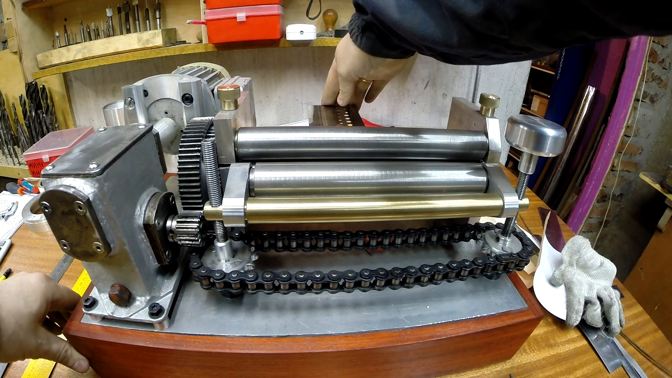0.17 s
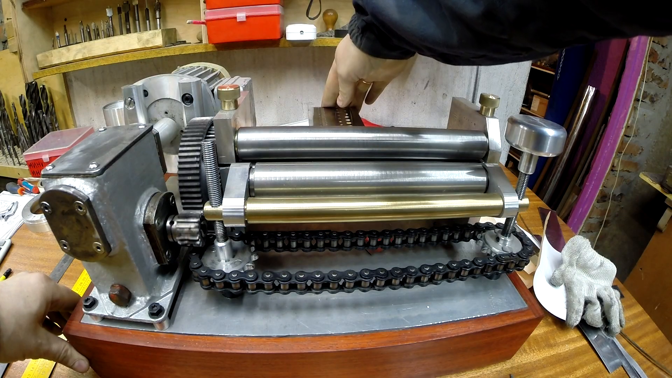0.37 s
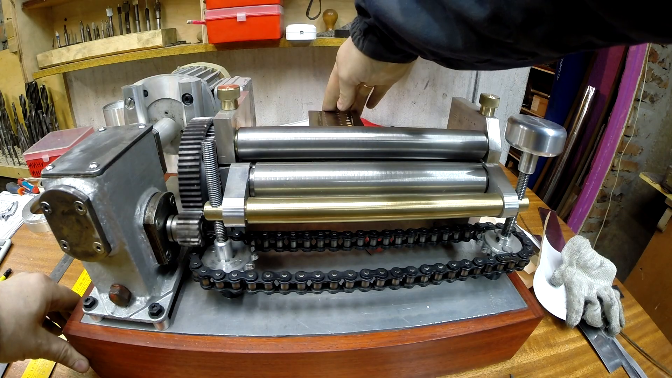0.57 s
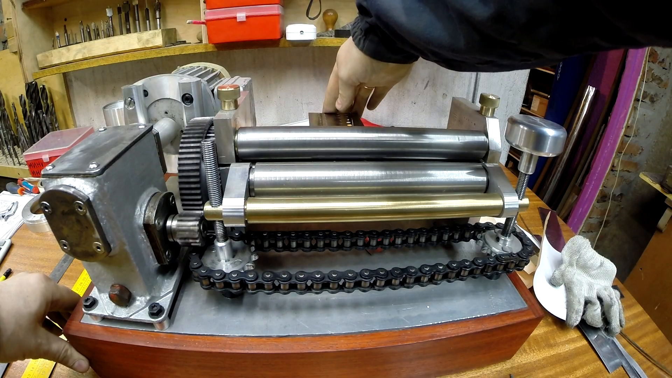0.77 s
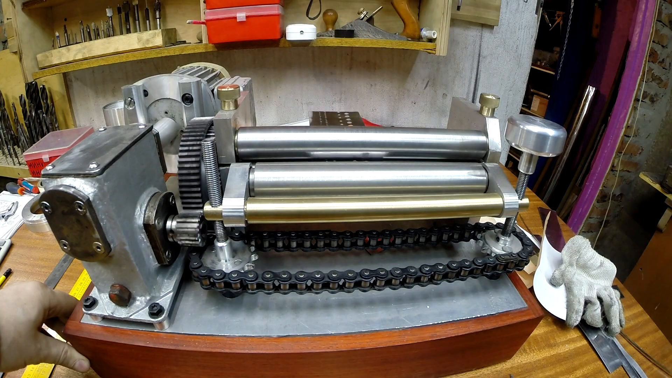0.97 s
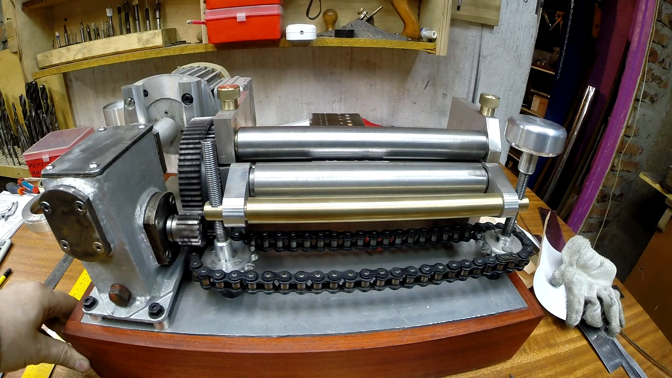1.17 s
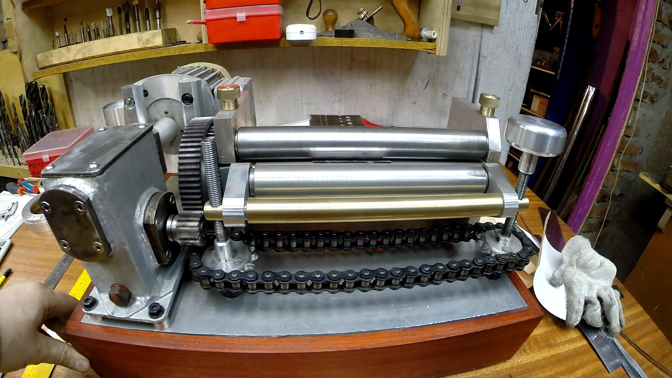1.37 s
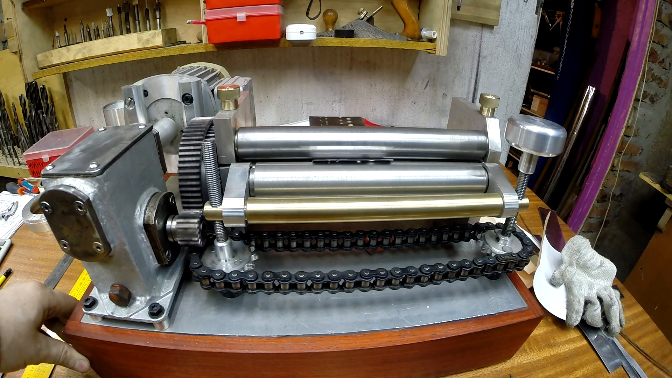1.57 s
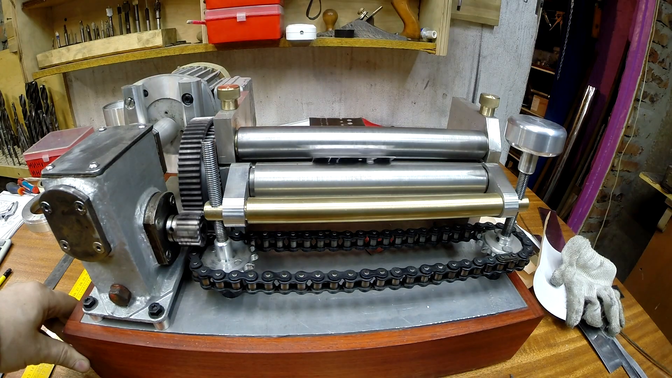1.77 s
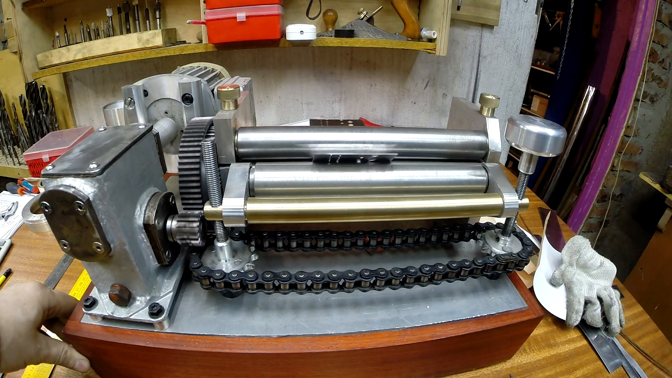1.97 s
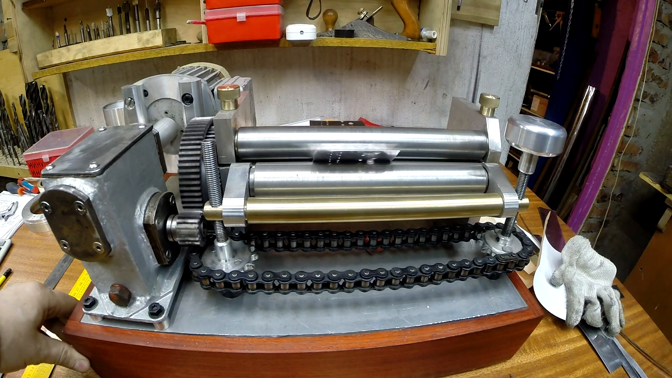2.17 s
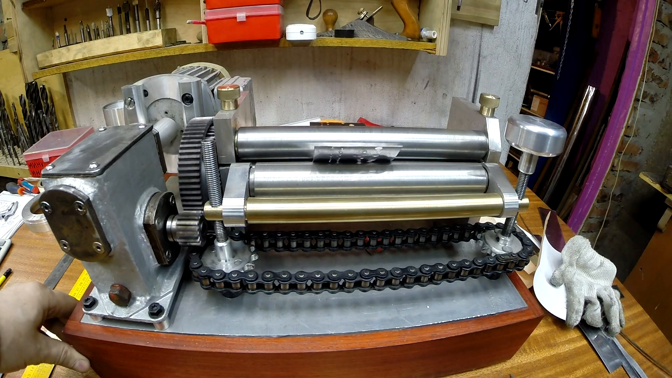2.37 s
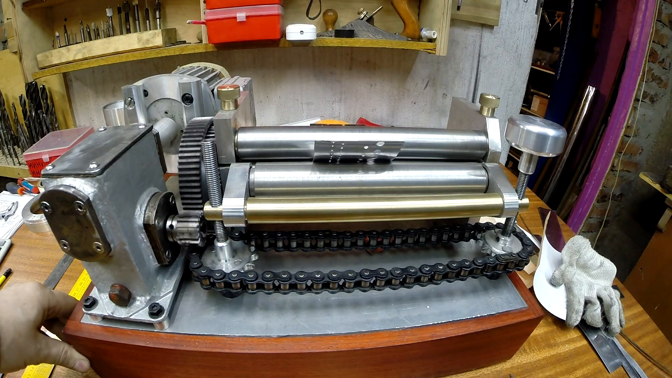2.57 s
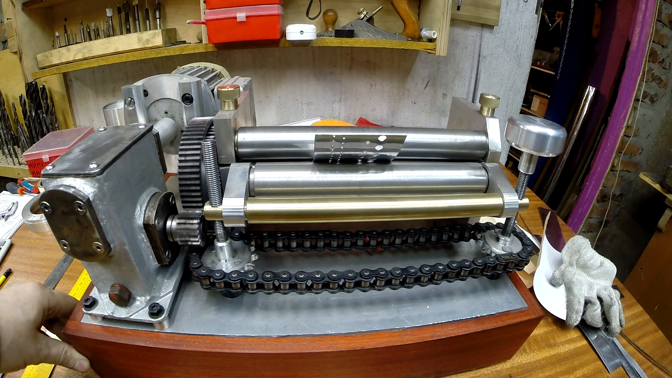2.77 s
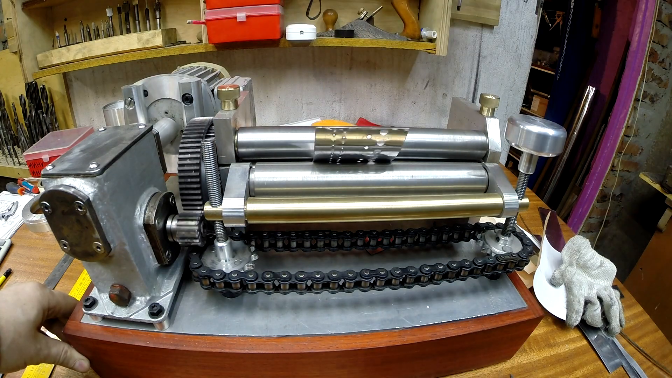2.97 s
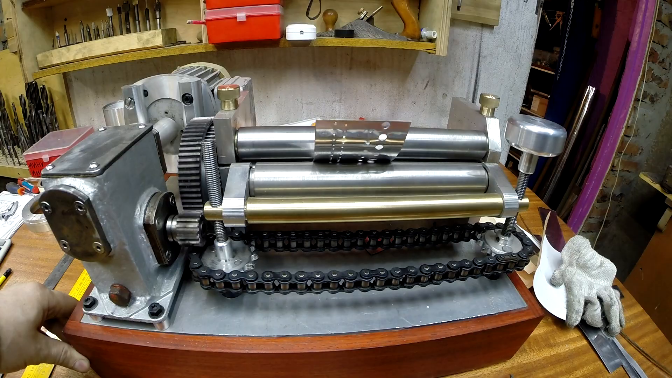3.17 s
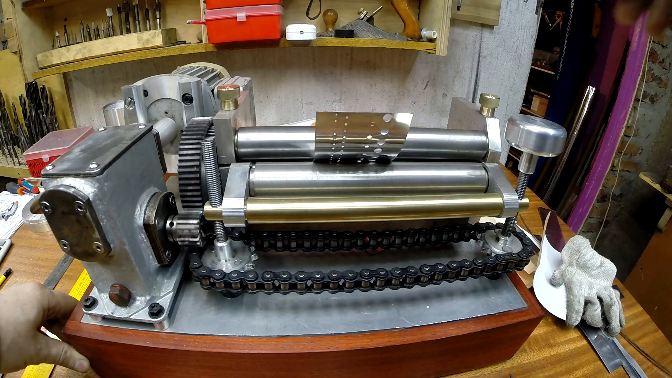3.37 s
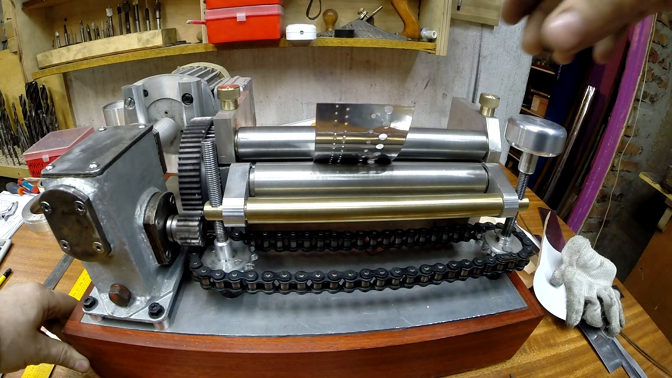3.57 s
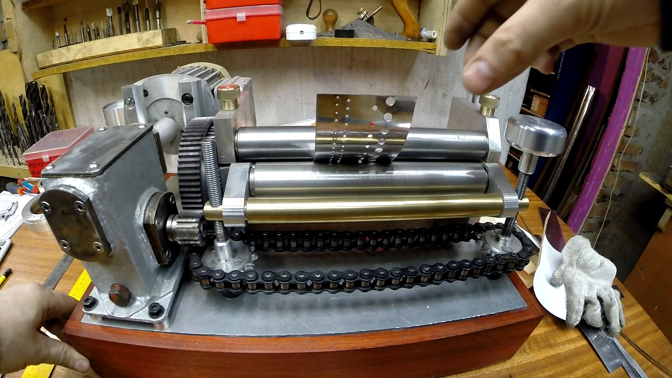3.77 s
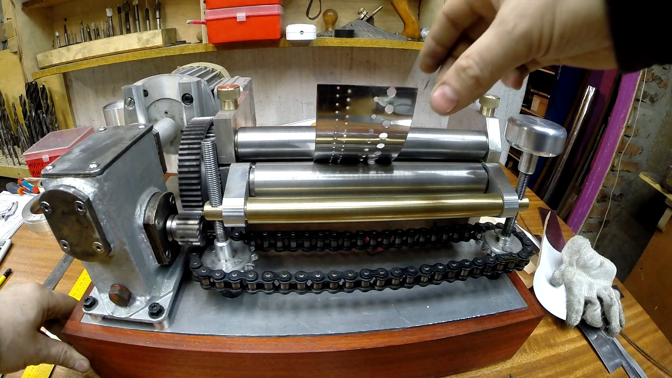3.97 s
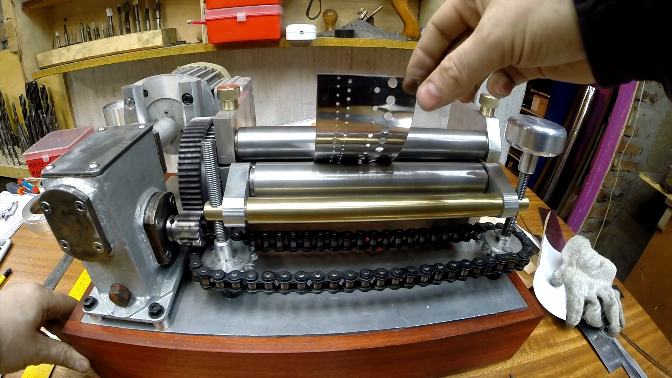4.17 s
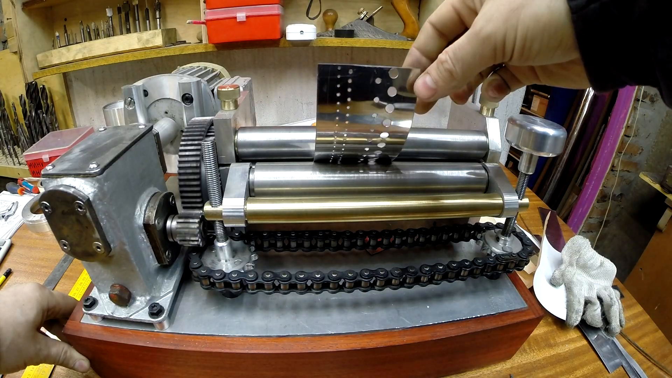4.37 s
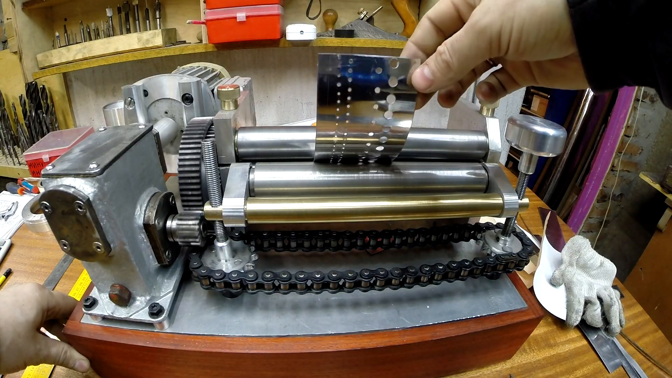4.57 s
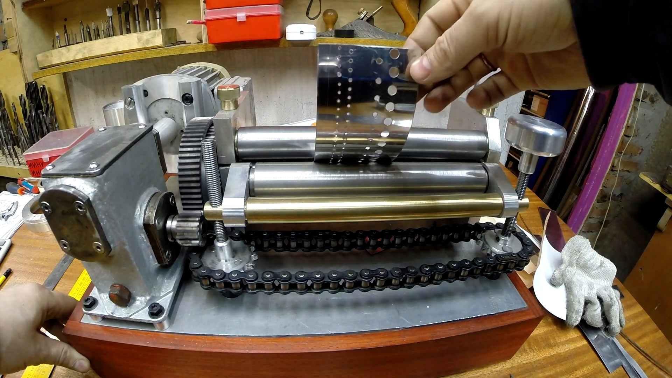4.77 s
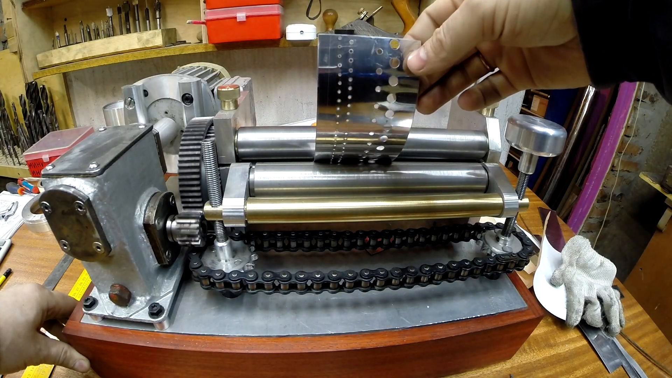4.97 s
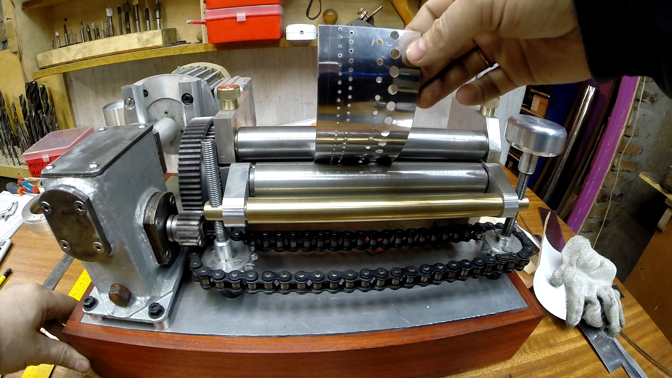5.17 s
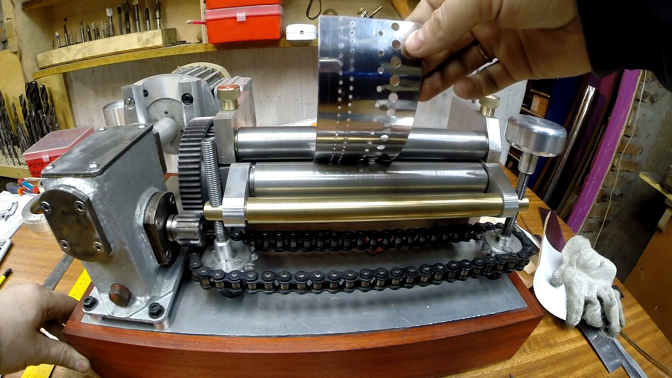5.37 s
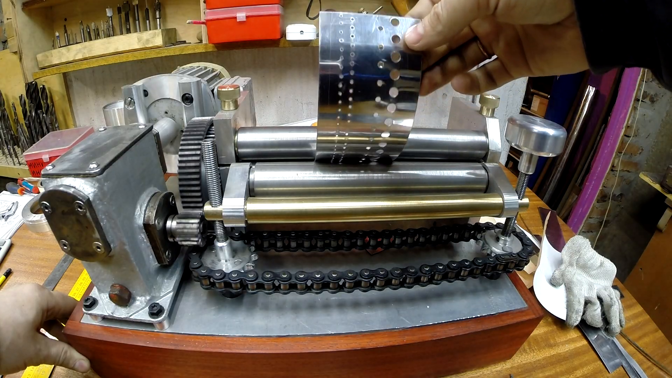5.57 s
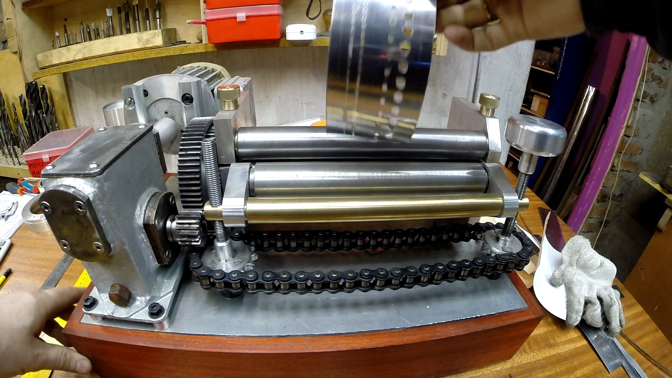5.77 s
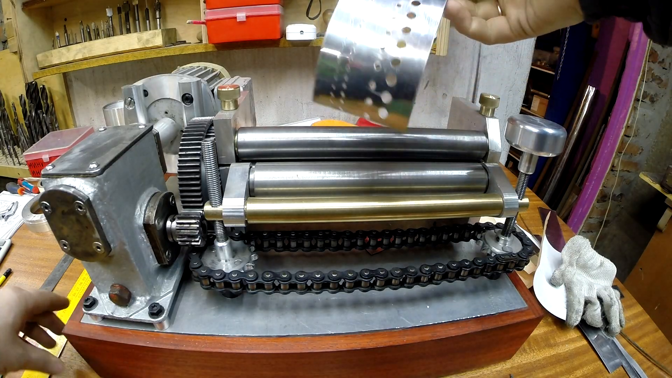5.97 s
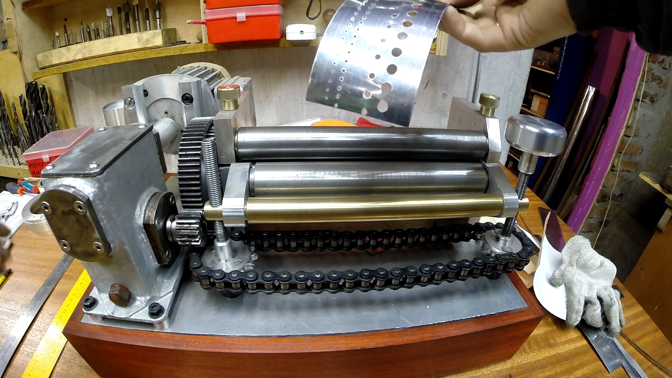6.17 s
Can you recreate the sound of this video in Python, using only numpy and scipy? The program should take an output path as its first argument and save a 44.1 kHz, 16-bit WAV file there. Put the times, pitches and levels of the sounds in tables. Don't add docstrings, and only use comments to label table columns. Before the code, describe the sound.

In a quiet workshop with faint fan air, a low thump of a button starts a small geared rolling machine. Gears clack, growl and settle into a loud, rough hum with rapid knocking, about twenty-six beats a second, over a booming wooden box. A brief cut comes near one second. Late on, a thin steel strip springs off the roller with bright clinks, then the motor brakes abruptly. Close, dry single microphone.

```python
import sys
import numpy as np
from scipy import signal
from scipy.fft import rfft, irfft, next_fast_len
from scipy.io import wavfile
from scipy.ndimage import uniform_filter1d

SR = 44100
rng = np.random.default_rng(int(sys.argv[2]) if len(sys.argv) > 2 else 0)


def log_audio(samples):
    frames = np.atleast_2d(samples).T
    limited = np.clip(frames, -1, 1)
    pcm = np.round(limited * 32767).astype(np.int16)
    wavfile.write(sys.argv[1], SR, pcm)


def volts_from_db(level):
    exponent = np.asarray(level, float) / 20
    return 10 ** exponent


N = 274159
TIME_S = np.arange(N) / SR
COARSE = 8
TURN_SIZE = 1711

SHAFT_HZ, KNOCK_S = 25.768, 3.111
CHANGE_S, CHANGE_TURNS = .9195, .23
ENGAGE_S, FREED_S = .3167, 5.38
SHIFT_S, SHIFT_LENGTH_S = 3.5, .4
# time_s, share of full speed
SPEED = [
    (0.275, 0.011),
    (0.365, 1.0),
    (5.75, 1.0),
    (5.88, 0.098),
]
# time_s, lead_turns
LEAD = [(0.95, -0.005), (1.27, -0.024), (1.59, -0.018), (1.91, -0.032), (2.23, -0.008), (2.55, -0.008),
        (2.87, -0.002), (3.19, -0.0), (3.51, -0.002), (3.83, 0.012), (4.15, 0.014), (4.47, 0.018),
        (4.79, 0.007), (5.11, -0.015), (5.43, -0.013), (5.75, -0.034)]
JITTER_TURNS, JITTER_RATE_HZ = .004, 3.5

# freq_hz, level_db per Hz
ROOM = [(15, -37), (25, 0.5), (163, -3.5), (219, 1.5), (354, -5), (1800, -19), (11200, -35), (15000, -33)]
ROOM_DB = -55
# pitch_hz, level_db (rms)
FAN_LINES = [(202, -66), (263.8, -65), (457.6, -64), (672.9, -69), (786.0, -67), (985, -71), (1050, -64)]
FAN_AIR_DB, FAN_TOP_HZ = -60, 1080
SUPPLY_HZ, SUPPLY_DB = 12650, -90

# multiple, level_db
BUTTON_OVERTONES = [(1, 0), (2, -24), (3, -28)]
BUTTON_HZ = 91

# offset_hz at full speed, level_db (rms), change_db once the load shifts
WHINE = [(-471, -78, -5), (-365, -81, -5), (-311.5, -78, 8), (-151, -82, -6), (-26.5, -84, -2),
         (6, -81, -7), (26.5, -84, 0), (80, -82, -5), (133, -81, -1), (151.5, -81, 4), (204.5, -80, 2),
         (311.5, -71, -3)]
CARRIER_HZ, WHINE_TRIM_DB = 9991.5, 1.5
SWELL_S, SWELL_DB = 3.55, 7

# time_s, peak_db, brightness_db, crack_db, hardness_db
CLINKS = [
    (0.3167, -19.5, 2, -20, -8),
    (0.9242, -18, -6, -17, -10),
    (3.9614, -31, 6, -9, 0.5),
    (5.3672, -18, 9, -11, 3),
    (5.3961, -13.5, 8, -8, 2.5),
    (5.406, -22, 4, -6, 0.5),
    (5.437, -21, -12, -15, 0.5),
    (5.4763, -21, -6, -14, 0.5),
    (5.655, -24, 1.5, -18, -3),
    (5.711, -24, 3, 5, 6),
]
# pitch_hz, level_db, t60_s
STRIP = [(91, -17, 0.068), (863, 3, 0.08), (1027, 5.5, 0.037), (1290, -1.5, 0.056), (2130, 0.5, 0.035),
         (2365, -3, 0.055), (2930, -8, 0.038), (3240, -6, 0.03), (3650, -14, .02), (4330, -22, .03)]
STRIP_HIGH = [(5300, -13.5, .05), (6450, -10, 0.05), (6800, -7, 0.06), (8000, -13, .02), (8800, -16, .03),
              (10700, -12, .015), (12400, -19, .04), (13000, -20, .07)]
HARD_HZ = 2300

# pitch_hz, width_hz, level_db
BOX = [(117, 20, -18), (178, 35, -23), (203, 18, -7.5), (250, 23, -4.5), (313.2, 44, 5), (362, 10, -24)]
CASE = [(440, 24, -7), (490, 36, -9), (545, 55, -9), (625, 36, 2.5), (690, 63, 5), (771, 81, -1.5),
        (866, 50, -4), (930, 30, -7), (1050, 170, -7), (1290, 140, -14), (1425, 60, -19), (1565, 40, -16)]
ROLLERS = [(1560, 165, -5.5), (1960, 500, -5), (2358, 40, 1.5), (2188, 280, -8.5)]
SPUR = [(2600, 150, -8), (2800, 300, -2), (3195, 246, 1.5), (3360, 220, -3), (3660, 230, -28)]
BEARINGS = [(4410, 530, -3), (5380, 380, 3.5), (6160, 500, -8), (6700, 500, -9.5), (7500, 2000, -13),
            (10100, 900, -12.5), (12600, 2500, -34.5)]
TICK = [(7040, 110, 5.5), (7670, 99, 4.5), (12120, 300, -10.5), (12700, 300, -11.5), (13300, 330, -10)]
GRIPPED = [(1866, 72, 0.5), (1948, 110, -2)]
IDLE = [(1350, 90, 0), (1450, 80, -3), (1560, 90, -3)]
LOOSE = [(850, 90, 6), (1300, 120, 2), (1950, 80, 1), (2150, 60, 1), (2350, 60, 1), (2610, 70, -2)]
SURGE = [(600, 70, -1.5), (800, 69, 6), (880, 180, -9), (1300, 200, -16)]

# start_s, attack_s, top_db, sag_db per s, let_go_s, fall_db per s
GRIP_RUN = (.92, .01, -39.8, -.3, 5.4, 60)
IDLE_RUN = (.33, .04, -42, 6, .9, 500)
LOOSE_RUN = (5.39, .02, -35.5, 0, 5.775, 480)
SURGE_RUN = (.36, .05, -18.5, 9, .43, 45)
SWAY_RUN = (.33, .03, -49, .2, 5.85, 55)
SCRAPE_RUN = (5.59, .06, -57, 5, 5.68, 300)
PRESS_RUN = (.225, .02, -30.5, 3, .3, 370)
TICK_RUN = (.32, .03, -66.5, -.2, 3.7, 3.5)
# level_db, rise_db per octave of speed, free_db once unloaded, brake_s, fade_db per s
BOX_RUN = (-21.5, 2, 0.2, 5.79, 300)
CASE_RUN = (-25, 0.1, 1.6, 5.78, 310)
ROLLERS_RUN = (-41.8, 12, 0.5, 5.775, 450)
SPUR_RUN = (-41.7, 12, 4, 5.775, 470)
BEARINGS_RUN = (-53.5, 6, 1.1, 5.765, 380)
EMPTY_DB, SPUR_EMPTY_DB = -3, -0.8
COAST_DB, COAST_FADE_DB = -15, 190

# multiple of the shaft rate, level_db (rms)
BOX_ORDERS = [(4, -59), (6, -49), (7, -50), (8, -38), (9, -33.5), (10, -39.5), (11, -40.5), (12, -28),
              (13, -35), (14, -41)]
CASE_ORDERS = [(17, -46), (18, -49), (19, -47), (20, -48), (21, -34), (22, -36.5), (23, -39.5), (24, -39),
               (25, -42.5), (26, -52), (27, -32), (28, -33.5), (29, -42), (30, -45), (31, -45), (32, -50),
               (33, -49), (34, -50), (35, -51), (36, -47)]
# multiple of the shaft rate, level_db (rms)
SLOT_LINES = [(45.07, -47), (46.07, -49), (47.07, -38), (48.07, -48)]
MAGNET_HZ, MAGNET_DB, MAGNET_CHANGE_TURNS = 285.0, -27, .07

# time_s, extra_db,
# length_s
BOOMS = [(.385, 3, .03), (.765, 2.5, .02), (.807, 3.5, .02), (2.2, 3, .04), (2.96, 1.5, .03),
         (3.1, 1.2, .1), (3.74, 2.2, .025), (3.85, 1.5, .05), (4.61, 2.5, .04), (5.2, 1.5, .06),
         (5.335, 3, .02), (5.525, -4, .015), (5.57, -3, .015), (5.63, 2.5, .03), (5.705, 3.5, .02),
         (5.757, 2.5, .012)]
# time_s, extra_db
JOLTS = [
    (.3167, 8.5),
    (.9242, 1.5),
]
JOLT_S = .022
# time_s, peak_db
KNOCKS = [(0.363, -12), (0.408, -11), (0.484, -13), (0.521, -10), (0.598, -10), (0.754, -13), (0.825, -15),
          (0.925, -13), (1.018, -13), (1.057, -14), (1.173, -12), (1.329, -13), (1.368, -13), (1.44, -14),
          (1.595, -13), (1.666, -14), (1.938, -15), (2.104, -11), (2.144, -13), (2.293, -14), (2.331, -12),
          (2.372, -14), (2.415, -12), (2.532, -15), (2.725, -14), (2.92, -13), (2.997, -15), (3.114, -13),
          (3.147, -14), (3.217, -15), (3.574, -14), (3.612, -14), (3.656, -12), (3.695, -14), (3.811, -13),
          (3.966, -13), (4.121, -14), (4.154, -12), (4.392, -13), (4.471, -13), (4.626, -15), (4.665, -14),
          (4.742, -14), (5.008, -13), (5.209, -12), (5.249, -14), (5.283, -15), (5.48, -14), (5.553, -15),
          (5.571, -15), (5.634, -14), (5.67, -12), (5.734, -16), (5.746, -13), (3.191, -13)]
KNOCK_USUAL_DB, KNOCK_SHARE, KNOCK_FADE_S = -14.5, .6, .016
# time_s, peak_db
THUDS = [(0.324, -15), (0.456, -13), (0.496, -13), (0.593, -13), (0.758, -7), (0.797, -6), (0.873, -12),
         (1.05, -16), (1.333, -13), (1.371, -14), (1.753, -16), (1.791, -14), (2.031, -13), (2.069, -13),
         (2.11, -13), (2.148, -14), (2.19, -11), (2.297, -14), (2.332, -12), (2.45, -15), (2.488, -14),
         (2.526, -13), (2.727, -13), (2.826, -14), (2.953, -8), (3.03, -11), (3.072, -11), (3.112, -10),
         (3.15, -12), (3.192, -12), (3.366, -12), (3.474, -13), (3.611, -14), (3.728, -8), (3.815, -10),
         (3.888, -11), (3.931, -11), (4.102, -13), (4.145, -14), (4.211, -11), (4.249, -12), (4.433, -13),
         (4.469, -13), (4.593, -9), (4.629, -12), (4.665, -11), (4.802, -15), (4.842, -14), (4.88, -14),
         (5.136, -11), (5.175, -11), (5.214, -8), (5.253, -14), (5.328, -9), (5.372, -9), (5.43, -12),
         (5.5, -12), (5.668, -12)]
THUD_USUAL_DB, THUD_SHARE, THUD_FADE_S = -14, .6, .016
CASE_RATTLE_DB, CASE_HUM_DB, BOX_RATTLE_DB, BLOW_DB = -26, -1.6, -27.5, -25
FREE_ORDERS_DB = -4.5
CASE_MEMORY, BOX_MEMORY, ROLLER_MEMORY = .55, .45, .25
TOP_HZ = 11500


def rms_one(x):
    return x / np.sqrt(np.mean(x ** 2) + 1e-20)


def in_time(rows):
    s, *columns = np.transpose(rows)
    return [np.interp(TIME_S, s, c) for c in columns]


def drift(rate_hz, size=1):
    r = np.exp(-80 * np.pi * rate_hz / SR)
    slow = signal.lfilter([1], [1, -2 * r, r * r], rng.standard_normal(N // 40 + 2002))[2000:]
    return np.interp(np.arange(0, N, size) / 40, np.arange(len(slow)), rms_one(slow - slow.mean()))


def wander(spread_db, rate_hz, size=1):
    return np.exp(np.log(10) / 20 * spread_db * drift(rate_hz, size))


def envelope(start_s, attack_s, top_db, sag_db, end_s, fall_db):
    rise = np.clip((TIME_S - start_s) / attack_s, 0, 1) ** 2
    return rise * volts_from_db(top_db - sag_db * (TIME_S - start_s) - fall_db * np.maximum(TIME_S - end_s, 0))


def running(speed, level_db, rise_db, free_db, brake_s, fade_db):
    spin_up_db = rise_db * np.log2(speed) * (TIME_S < FREED_S)
    unloaded_db = free_db * np.clip((TIME_S - FREED_S) / .02, 0, 1)
    braking_s = np.maximum(TIME_S - brake_s, 0)
    coast = np.maximum(1, volts_from_db(COAST_DB + (fade_db - COAST_FADE_DB) * braking_s))
    held = envelope(ENGAGE_S - .002, .004, level_db, 0, brake_s, fade_db)
    return coast * held * volts_from_db(spin_up_db + unloaded_db)


def resonate(x, hz, width_hz):
    r = np.exp(-np.pi * 1.5 * width_hz / SR)
    section = [(1 - r * r) / 2, 0, (r * r - 1) / 2, 1, -2 * r * np.cos(2 * np.pi * hz / SR), r * r]
    return signal.sosfilt([section, section], x)


def ring(clicks, hz, t60_s):
    r, w = volts_from_db(-60 / (t60_s * SR)), 2 * np.pi * hz / SR
    return signal.lfilter([0, np.sin(w)], [1, -2 * r * np.cos(w), r * r], clicks + 1e-18)


def shaft_turns(speed):
    turns = np.cumsum(speed) * SHAFT_HZ / SR
    return turns - turns[round(KNOCK_S * SR)] - CHANGE_TURNS * (TIME_S < CHANGE_S)


def order_hum(turns, lines, body_hz, width_hz, wander_db, wander_rad):
    out = 0
    for k, level_db in lines:
        lag = np.arctan(2 * (k * SHAFT_HZ - body_hz) / width_hz)
        phase = wander_rad * drift(1.02, COARSE) - lag
        gain = np.sqrt(2) * volts_from_db(level_db) * wander(wander_db, 2.57, COARSE)
        out = out + gain * np.cos(2 * np.pi * k * turns[::COARSE] + phase)
    return signal.resample_poly(out, COARSE, 1)[:N]


def rattle(turns, modes, force_db, burst_db, fade_turns, knock, patchy_db, memory=0, hits=0):
    since = turns % 1
    burst = np.exp(-since / fade_turns) * (1 - np.exp(-since / .08))
    flare = volts_from_db(force_db) * (volts_from_db(burst_db) * burst + 1)
    new_turn = np.diff(np.floor(turns), prepend=0)
    blows = hits + new_turn * volts_from_db(force_db) * knock * np.sqrt(SR / SHAFT_HZ)
    contacts = rng.standard_normal((2, N // TURN_SIZE + 1, TURN_SIZE))
    teeth = signal.lfilter([np.sqrt(1 - memory ** 2)], [1, -memory], contacts, axis=1)
    grit = teeth.reshape(2, -1)[:, :N] * flare
    out = 0
    for k, (hz, width_hz, level_db) in enumerate(modes):
        gain = np.repeat(volts_from_db(level_db) * wander(patchy_db, 6.2, COARSE), COARSE)[:N]
        out = out + (-1) ** k * gain * resonate(grit[k % 2] + blows, hz, width_hz)
    return rms_one(out)


def workshop():
    size = next_fast_len(N)
    hz = np.fft.rfftfreq(size, 1 / SR) + 1
    room_hz, room_db = np.transpose(ROOM)
    tint = volts_from_db(np.interp(np.log(hz), np.log(room_hz), room_db))
    air = irfft(rfft(rng.standard_normal(size)) * tint, size)[:N] + 1e-18
    band = signal.butter(4, [350, FAN_TOP_HZ], "band", fs=SR, output="sos")
    fan = volts_from_db(FAN_AIR_DB) * rms_one(signal.sosfilt(band, rng.standard_normal(N)))
    for pitch_hz, level_db in FAN_LINES:
        tone = np.sin(2 * np.pi * (pitch_hz * TIME_S + rng.random()))
        fan += np.sqrt(2) * volts_from_db(level_db) * wander(1.5, 8) * tone
    whistle = np.sqrt(2) * volts_from_db(SUPPLY_DB) * np.sin(2 * np.pi * SUPPLY_HZ * TIME_S)
    return volts_from_db(ROOM_DB) * rms_one(air) + whistle + fan * volts_from_db(-14.0 * (TIME_S < .3))


def button():
    hum = sum(volts_from_db(level_db) * np.sin(2 * np.pi * k * BUTTON_HZ * (TIME_S - .2355))
              for k, level_db in BUTTON_OVERTONES)
    return np.sqrt(2) * envelope(*PRESS_RUN) * hum


def whine(speed):
    run = np.cumsum(speed) / SR
    supply = np.interp(TIME_S, [.27, .29, 5.6, 5.7, 5.84], [0, 1, 1, .5, 0])
    power = volts_from_db(WHINE_TRIM_DB + 9.0 * (1 - speed)) * supply
    shift = np.clip((TIME_S - SHIFT_S) / SHIFT_LENGTH_S, 0, 1)
    swell_db = SWELL_DB * np.exp(-((TIME_S - SWELL_S) / 0.2) ** 2)
    out = np.zeros(N)
    for offset_hz, steady_db, change_db in WHINE:
        level_db = steady_db + change_db * shift + 1.5 * drift(3) + swell_db * (offset_hz > 300)
        cycles = CARRIER_HZ * TIME_S + offset_hz * run + rng.random()
        out += np.sqrt(2) * volts_from_db(level_db) * np.sin(2 * np.pi * cycles)
    return power * out


def fan_tick(speed, turns):
    rub = rattle(turns + 0.49, TICK, 1.0 * drift(14), 15, 0.2, knock=0, patchy_db=0.5)
    return envelope(*TICK_RUN) * speed ** 2 * rub


def sway():
    return np.sqrt(2) * envelope(*SWAY_RUN) * np.cos(2 * np.pi * SHAFT_HZ * TIME_S + 1.9)


def strip():
    s, peak_db, bright_db, crack_db, hard_db = np.transpose(CLINKS)
    at = np.round(s * SR).astype(int)
    rub = envelope(*SCRAPE_RUN) * rng.standard_normal(N) * volts_from_db(3.2 * drift(120))
    modes = STRIP + STRIP_HIGH
    luck_db = rng.normal(0, 1.9, (len(at), len(modes)))
    out = np.zeros(N)
    for k, (hz, level_db, t60_s) in enumerate(modes):
        high, top = k >= len(STRIP), hz > 12000
        clicks = volts_from_db(-14 + level_db + 3.0 * top) * rub * high
        tone_db = bright_db - 31 - 12.0 * top if high else hard_db * (hz > HARD_HZ)
        clicks[at] += volts_from_db(peak_db - 6 + level_db + luck_db[:, k] + tone_db)
        out += resonate(ring(clicks, hz, t60_s), hz, .4 * hz)
    blows = np.zeros(N)
    blows[at] = volts_from_db(peak_db + crack_db)
    crack = signal.lfilter([1], [1, -volts_from_db(-60 / (0.05 * SR))], blows + 1e-18) * rng.standard_normal(N)
    out += resonate(resonate(crack, 2200, 2600), 2500, 2600)
    snap = np.zeros(N)
    snap[at[-1]:at[-1] + 260] = volts_from_db(-33) * rng.standard_normal(260) * np.hanning(260)
    out += resonate(snap + 1e-18, 10500, 2000)
    out += volts_from_db(1.5) * resonate(ring(snap, 4700, .006), 4500, 3000) / 12
    return out + volts_from_db(5.5) * resonate(rub + 1e-18, 8000, 8000)


def bearings(speed, turns, force_db):
    hiss = rattle(turns, BEARINGS, 0.48 * force_db, -30, .2, knock=0, patchy_db=0.6)
    return running(speed, *BEARINGS_RUN) * hiss


def backlash_surge(turns, force_db, knock_db):
    growl = rattle(turns + .05, SURGE, force_db + .4 * knock_db, 9, 0.25, knock=.05, patchy_db=1.5)
    return envelope(*SURGE_RUN) * growl * (TIME_S < CHANGE_S)


def rollers_and_spurs(speed, turns, force_db, knock_db):
    empty = TIME_S < CHANGE_S
    roll = rattle(turns, ROLLERS, 0.2 * force_db, 1, 0.11, knock=0.07, patchy_db=0.06, memory=ROLLER_MEMORY)
    spur = rattle(turns + .07, SPUR, 1.5 * force_db, 5, 0.16, knock=0, patchy_db=0.3)
    grip = rattle(turns - .2, GRIPPED, 0.29 * force_db, 3, 0.15, knock=0.15, patchy_db=1.5,
                  memory=ROLLER_MEMORY)
    idle = rattle(turns + .05, IDLE, force_db, 5, .25, knock=0, patchy_db=2.1, memory=CASE_MEMORY)
    loose = rattle(turns, LOOSE, 2.5 * drift(60) + .5 * knock_db, 0, .3, knock=0, patchy_db=2.1)
    out = running(speed, *ROLLERS_RUN) * volts_from_db(EMPTY_DB * empty) * roll
    out += running(speed, *SPUR_RUN) * volts_from_db(SPUR_EMPTY_DB * empty) * spur
    return out + envelope(*GRIP_RUN) * grip + envelope(*IDLE_RUN) * idle + envelope(*LOOSE_RUN) * loose


def hard_knocks(table, usual_db, share, fade_s, size):
    s, peak_db = np.transpose(table)
    kicks, r = np.zeros(N), np.exp(-1 / (fade_s * SR))
    kicks[np.round(s * SR).astype(int)] = share * (peak_db - usual_db)
    return uniform_filter1d(signal.lfilter([1], [1, -r], kicks + 1e-18), size=size)


def blows_on_case():
    s, peak_db = np.transpose(KNOCKS)
    hits = np.zeros(N)
    hits[np.round(s * SR).astype(int)] = SR / SHAFT_HZ * volts_from_db(BLOW_DB + peak_db)
    return hits


def gear_case(speed, plain_turns, turns, force_db, knock_db):
    slots = order_hum(plain_turns, SLOT_LINES, 1200, 300, wander_db=1.7, wander_rad=1.0)
    slots *= volts_from_db(1.2 - 0.6 * (TIME_S < CHANGE_S))
    hum = order_hum(turns - .0665, CASE_ORDERS, 670, 30, wander_db=3.2, wander_rad=.4)
    hum *= volts_from_db(CASE_HUM_DB + .6 * knock_db + FREE_ORDERS_DB * (TIME_S > FREED_S))
    grit = rattle(turns + .05, CASE, force_db, 2.5, .2, knock=.02, patchy_db=1.7,
                  memory=CASE_MEMORY, hits=blows_on_case())
    case = volts_from_db(CASE_RATTLE_DB + knock_db) * grit + speed ** 3 * (hum + slots)
    return volts_from_db(24.7) * running(speed, *CASE_RUN) * case


def magnet_hum(speed):
    cycles = MAGNET_HZ * np.cumsum(speed) / SR
    cycles = cycles - cycles[round(KNOCK_S * SR)] + MAGNET_CHANGE_TURNS * (TIME_S < CHANGE_S)
    return np.sqrt(2) * volts_from_db(MAGNET_DB + 1.2 * drift(3)) * np.cos(2 * np.pi * cycles + .7)


def wooden_box(speed, turns, force_db):
    boom_db = hard_knocks(THUDS, THUD_USUAL_DB, THUD_SHARE, THUD_FADE_S, size=440)
    for s, extra_db, length_s in BOOMS:
        boom_db += extra_db * np.exp(-((TIME_S - s) / length_s) ** 2)
    grit = rattle(turns - .15, BOX, force_db, 6, 0.2, knock=0, patchy_db=2.5, memory=BOX_MEMORY)
    hum = order_hum(turns - .194, BOX_ORDERS, 245, 10, wander_db=1.4, wander_rad=.2)
    box = volts_from_db(BOX_RATTLE_DB) * grit + speed ** 3 * (magnet_hum(speed) - hum)
    return volts_from_db(21.2 + boom_db) * running(speed, *BOX_RUN) * box


def drive(speed, plain_turns):
    turns = plain_turns + in_time(LEAD)[0] + JITTER_TURNS * drift(JITTER_RATE_HZ)
    force_db = 0.43 * drift(24) + 0.4 * drift(120)
    knock_db = hard_knocks(KNOCKS, KNOCK_USUAL_DB, KNOCK_SHARE, KNOCK_FADE_S, size=132)
    jolt_db = sum(extra_db * np.exp(-np.abs(TIME_S - s) / JOLT_S) * (TIME_S > s) for s, extra_db in JOLTS)
    body = wooden_box(speed, turns, force_db) + gear_case(speed, plain_turns, turns, force_db, knock_db)
    out = volts_from_db(jolt_db) * body + rollers_and_spurs(speed, turns, force_db, knock_db)
    return out + backlash_surge(turns, force_db, knock_db) + bearings(speed, turns, force_db)


def scene():
    speed = in_time(SPEED)[0]
    turns = shaft_turns(speed)
    machine = drive(speed, turns) + sway() + fan_tick(speed, turns) + whine(speed)
    return (machine + strip() + button() + workshop())[None]


def roll_off(x):
    return signal.sosfilt(signal.butter(12, 15190, fs=SR, output="sos"), x)


def record(dry):
    gap = np.clip(np.abs(TIME_S - CHANGE_S) / .005, .1, 1)
    soft = signal.sosfilt(signal.butter(1, TOP_HZ, fs=SR, output="sos"), dry)
    return roll_off(soft * gap)


dry = scene()
out = record(dry)
log_audio(out)
```